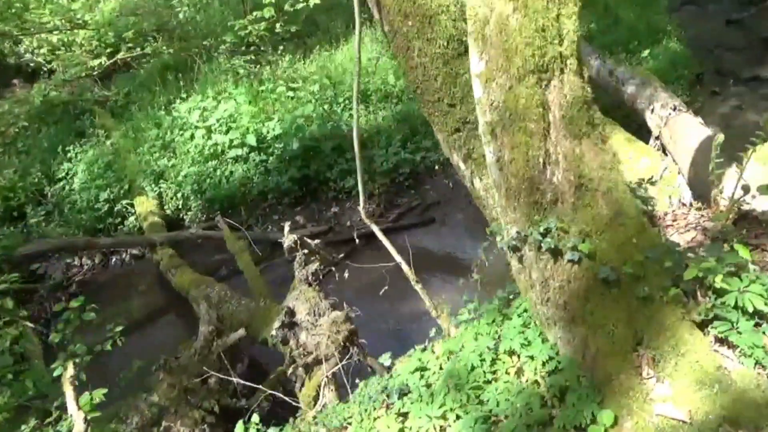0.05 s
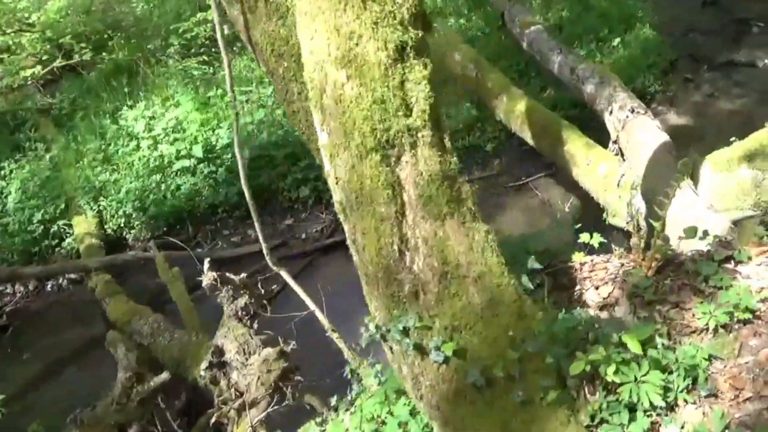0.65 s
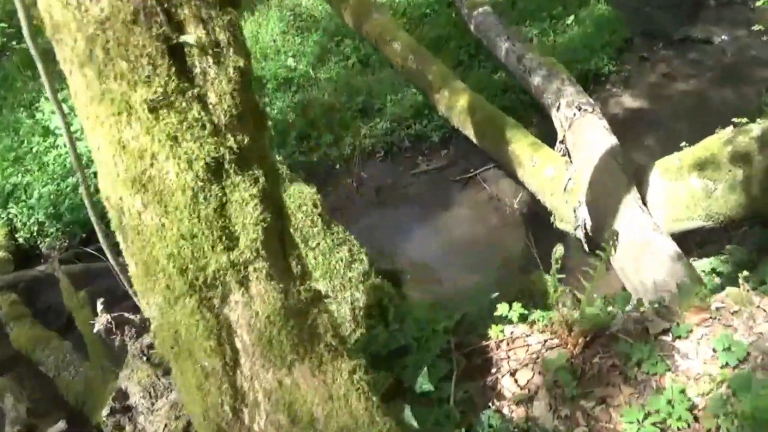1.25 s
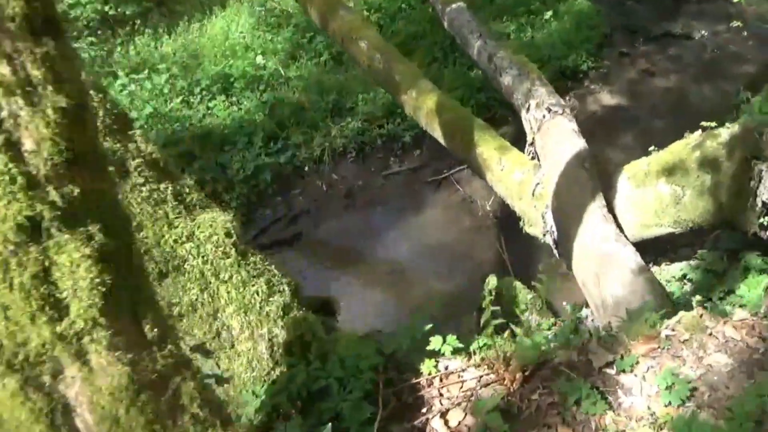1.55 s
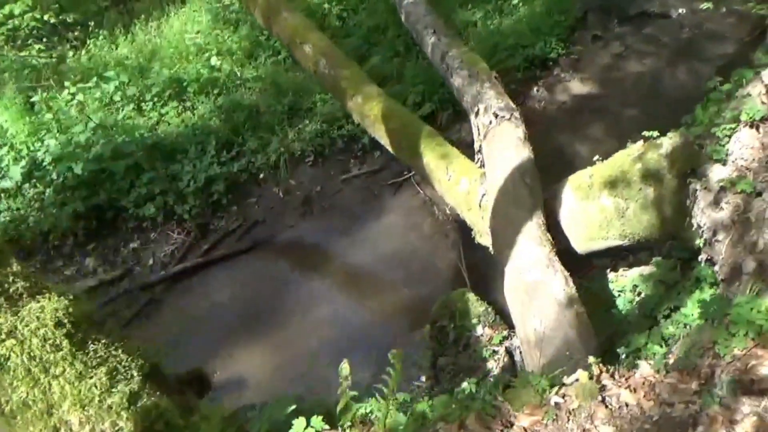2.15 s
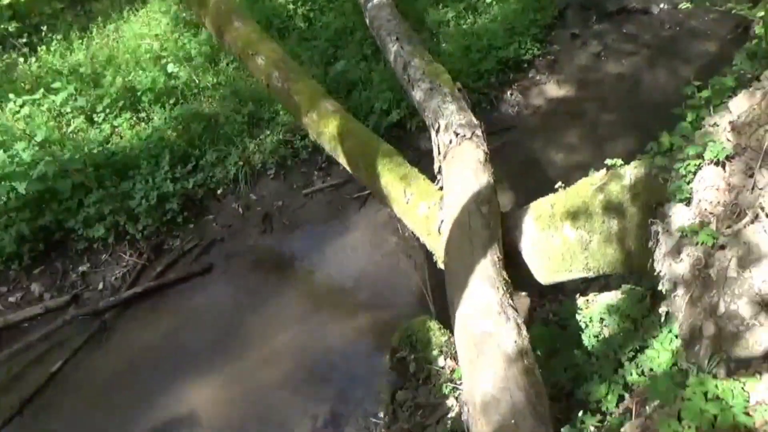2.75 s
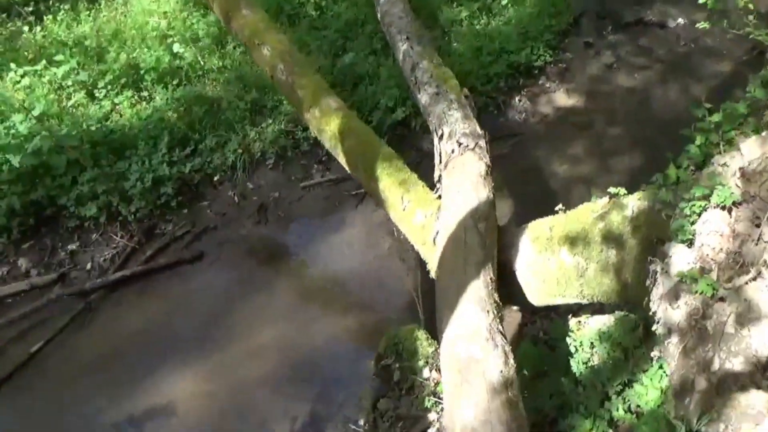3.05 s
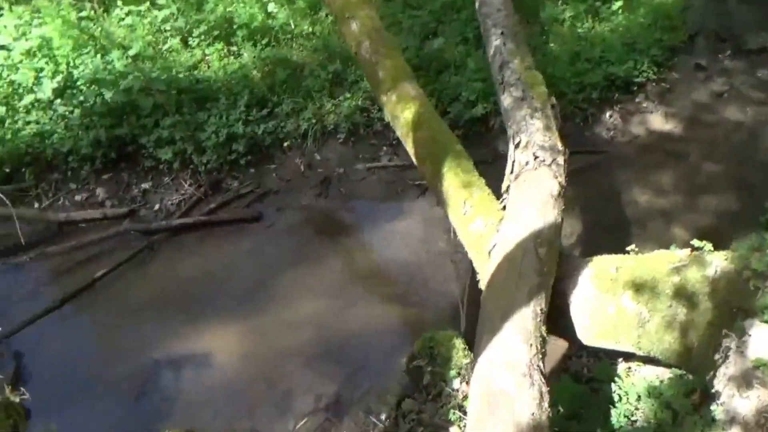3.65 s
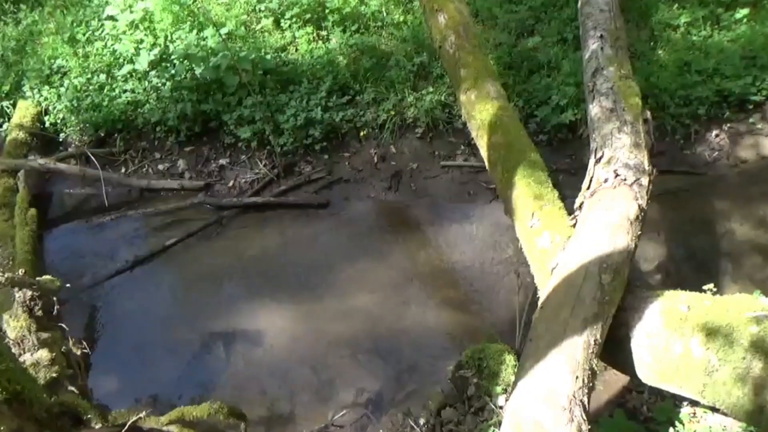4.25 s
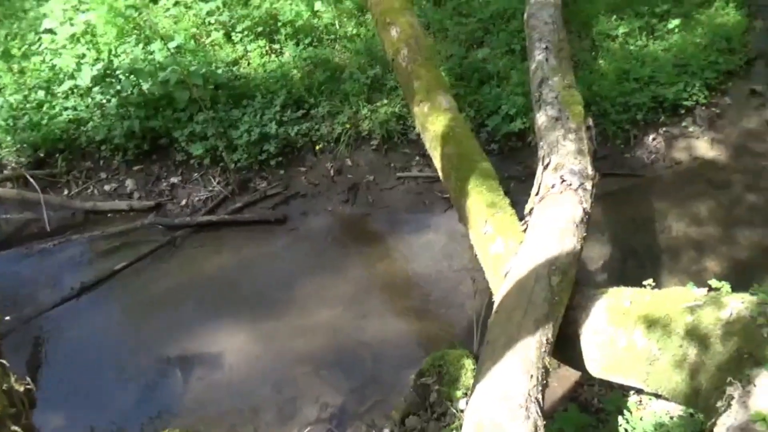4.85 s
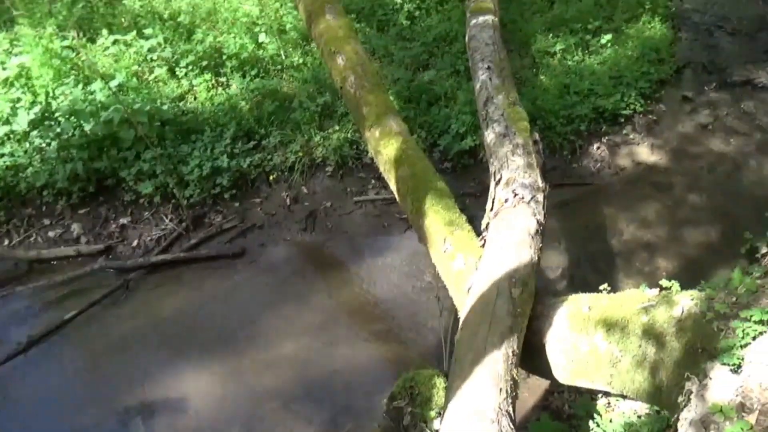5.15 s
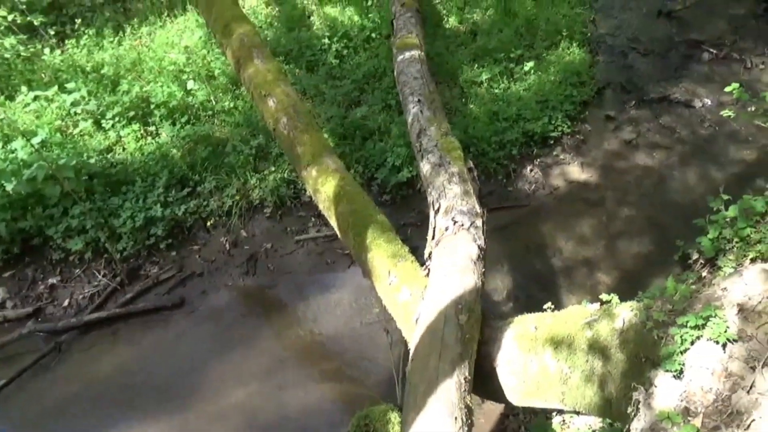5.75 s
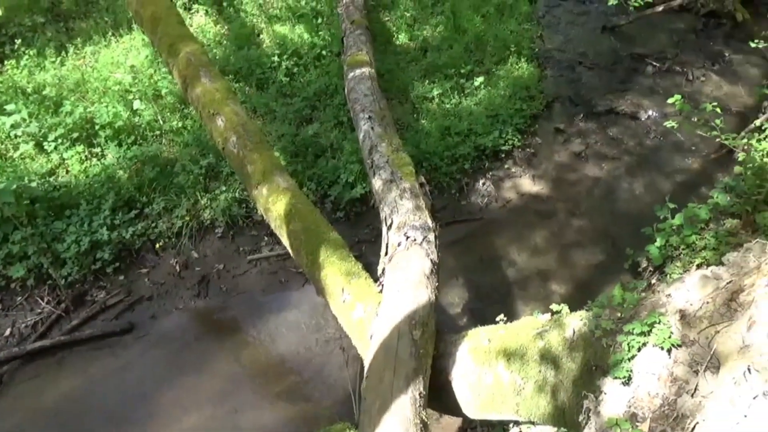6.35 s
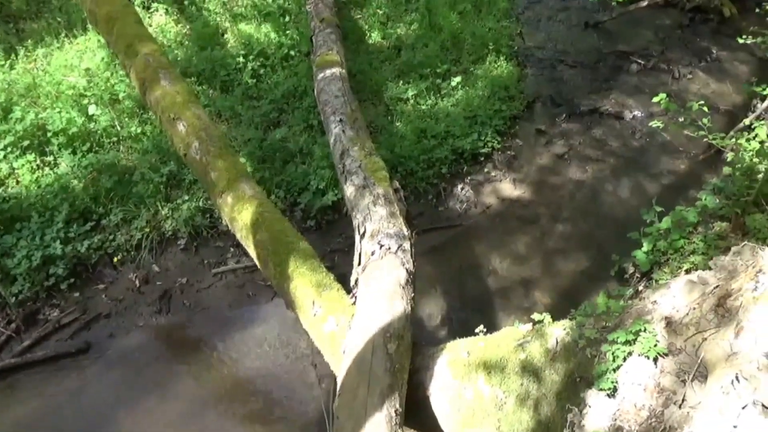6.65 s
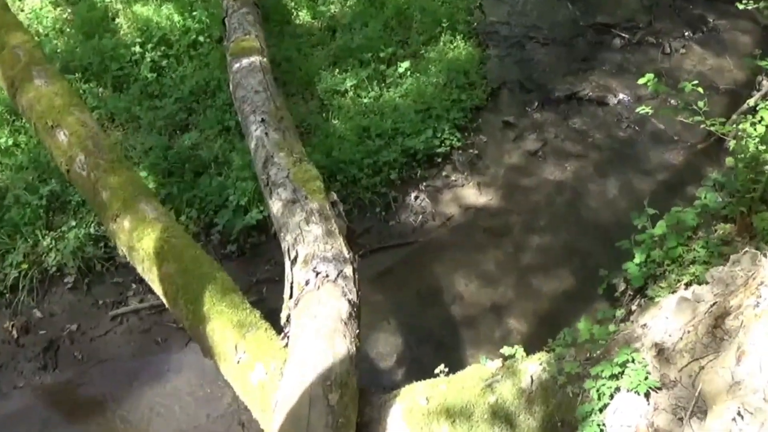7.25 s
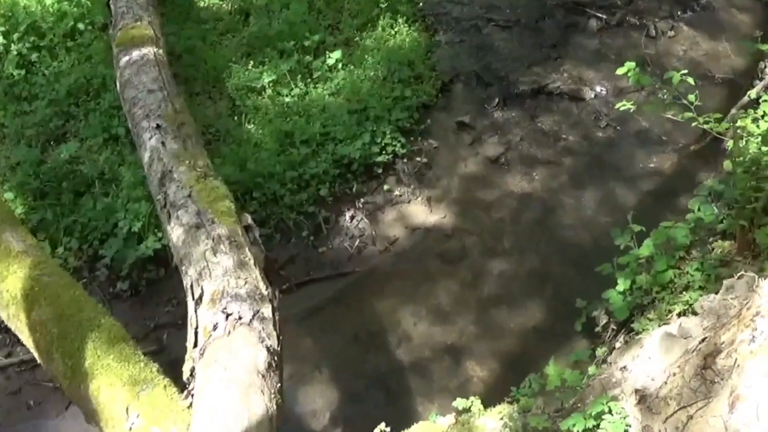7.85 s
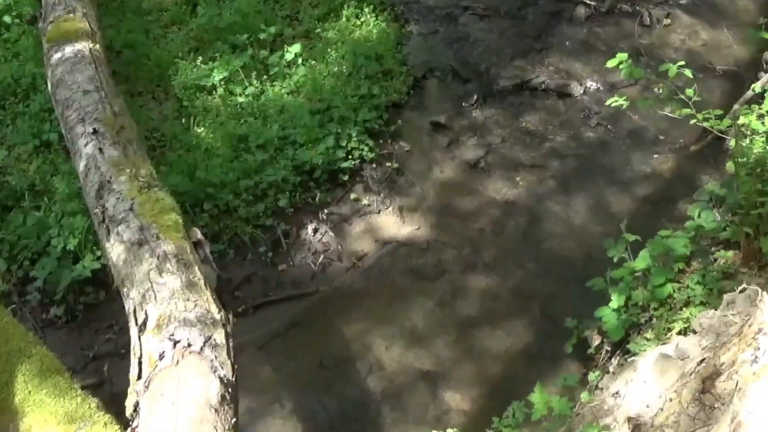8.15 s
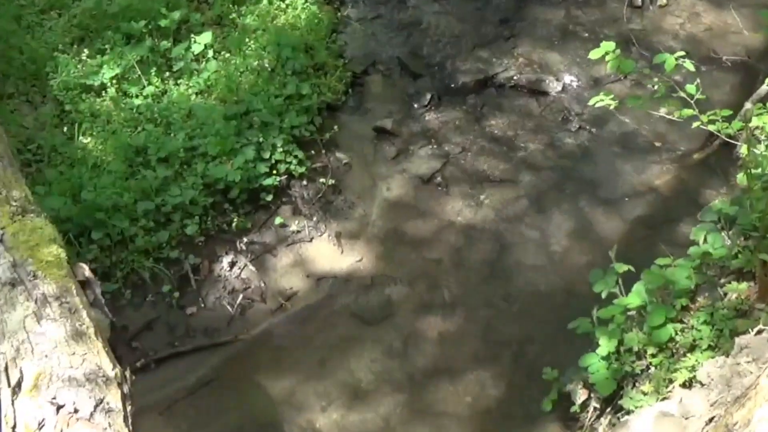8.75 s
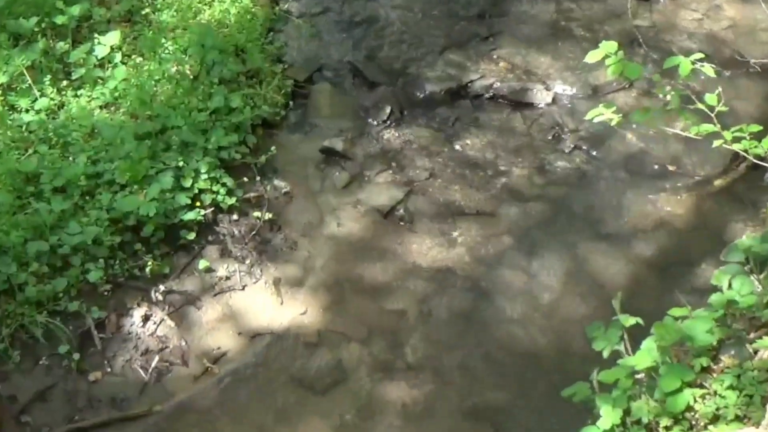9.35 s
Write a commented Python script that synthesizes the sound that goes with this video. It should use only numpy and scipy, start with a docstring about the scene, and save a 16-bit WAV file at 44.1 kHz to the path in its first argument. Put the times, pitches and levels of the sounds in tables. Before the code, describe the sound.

A shallow forest brook babbles over stones while feet shuffle in dry leaves nearby and small birds chirp faintly far off.

```python
"""Below a wooded bank, a shallow brook babbles over stones. Countless splashes sum to a wash of noise,
and trapped air resonates as swarms of small bubbles and single gurgles. Close by, someone shifts their
feet in dry leaves: stick-slip friction scuffs, brittle fracture crackles and snaps, impacts knock.
Small birds whistle far off in the reverberant trees, and a faint hum sounds for a while."""
import sys
import numpy as np
from scipy import signal
from scipy.fft import rfft, irfft
from scipy.io import wavfile
from scipy.ndimage import uniform_filter1d

SR = 44100
rng = np.random.default_rng(int(sys.argv[2]) if len(sys.argv) > 2 else 0)


def inscribe(sig):
    """Save sig as 16-bit PCM at rate SR to the path in sys.argv[1].

    A 1-D sig is mono; a 2-D sig holds one channel per row.
    Samples are clipped to [-1, 1] before scaling.
    """
    pcm = np.round(np.clip(np.atleast_2d(sig).T, -1, 1) * 32767)
    wavfile.write(sys.argv[1], SR, pcm.astype(np.int16))


N = 422919
TIME = np.arange(N) / SR


# Strength against pitch of the bubbles over the stones: f/Hz, relative level/dB
STONE_BUBBLES = [(450, -15), (580, -10), (800, -8), (1300, -5.5), (2300, -3), (3500, -3), (7000, -1.5)]
# The finer bubbles of the nearest riffle: f/Hz, relative level/dB
RIFFLE_BUBBLES = [(1000, -8), (2400, -1), (4800, 0)]

def brook(near_db=-42, far_db=-47, turn_s=6.2, wash_db=0.21, stones_db=-6, riffle_db=-8, banks_db=-8):
    """Superposition of wash and bubbles, fading as the listener turns from the nearest riffle."""
    facing = np.exp(-TIME / turn_s)
    flow = gain_of(far_db + (near_db - far_db) * facing)
    stones = gain_of(stones_db) * swarm(STONE_BUBBLES, count=3000, spread_db=4, cycles=6.4)
    riffle = gain_of(riffle_db) * facing * swarm(RIFFLE_BUBBLES, count=3000, spread_db=1, cycles=4.8)
    babble = flow * (stones + riffle) + gurgles()
    return flow * gain_of(wash_db) * wash() + babble + gain_of(banks_db) * scatter(babble, t60=0.07)


# Spectral density of the wash: f/Hz, relative level/dB
WASH_SPECTRUM = [(25, -48), (60, -26), (150, -22), (220, -12.5), (380, -10.5), (560, -0.5), (1200, 0),
                 (2400, -2), (3300, -4), (4600, -9), (6500, -10), (11000, -14)]
# Likeness of the diffuse sound at the two ears: f/Hz, coherence/1
EAR_COHERENCE = [(30, 0.89), (150, 0.83), (600, 0.87), (1400, 0.9), (2800, 0.73), (6000, 0.56),
                 (11000, 0.83)]

def wash(patchy_db=2.0, flicker_db=1.38):
    """Incoherent summation: far splashes merge into noise that swells in short, narrow patches."""
    frames, hz = N // 128 + 5, np.fft.rfftfreq(512, 1 / SR)
    a, b, c, d, patches = rng.standard_normal((5, frames, len(hz)))
    patches = smoothed(uniform_filter1d(patches, size=8, axis=0), 5)  # over time, then frequency
    flicker = smoothed(rng.standard_normal(frames), 5)[:, None]
    coherence = curve_at(EAR_COHERENCE, hz)
    left, unrelated = a + 1j * b, c + 1j * d
    right = coherence * left + np.sqrt(1 - coherence ** 2) * unrelated
    swell = gain_of(patchy_db * patches / (1 + hz / 9000) + flicker_db * flicker)
    spectra = np.array([left, right]) * swell
    _, noise = signal.istft(spectra.transpose(0, 2, 1), nperseg=512, noverlap=384)
    return coloured(noise[:, :N], WASH_SPECTRUM)


def bubble(hz, cycles, rise):
    """Resonance of trapped air: nearing the surface it dies faster and, for rise > 0, climbs in pitch."""
    age = np.arange(int(4 * cycles / hz * SR)) / SR * hz / cycles  # in ring times of cycles / hz
    swell = age * np.exp(-age - age ** 2 / 2)
    return swell / swell.max() * np.sin(2 * np.pi * cycles * (age + rise * (age ** 2 / 2 - age)))


def swarm(levels, count, spread_db, cycles, rise=0.073, width=0.23):
    """Resonance scales inversely with size: of many random bubbles, the smallest ring high and briefly."""
    out = np.zeros((2, N))
    low_hz, high_hz = levels[0][0], levels[-1][0]
    for when, pitch, rank, ring, glide, side in rng.random((count, 6)):
        hz = low_hz * (high_hz / low_hz) ** pitch
        level_db = curve_at(levels, hz) - spread_db * np.log(max(rank, .04))  # a few stand out
        ping = bubble(hz, cycles * (.5 + ring), rise * 2 * glide)
        add(out, when * N / SR, placed(gain_of(level_db) * ping, width * (2 * side - 1)))
    return out / rms(out)


# The clearest single bubbles: t/s, level/dB, f/Hz
CLEAR_GURGLES = [(0.71, -40.5, 614), (1.014, -33.5, 1190), (1.106, -34, 1330), (1.388, -30, 3380),
                 (3.365, -44.5, 445), (3.402, -41.5, 516), (3.458, -33, 3330), (3.76, -30.5, 1680),
                 (3.877, -39, 740), (4.982, -33.5, 760), (5.061, -37, 764), (5.217, -40, 654),
                 (5.352, -38, 632), (5.802, -37.5, 803), (5.94, -41, 714), (6.1, -39, 682),
                 (6.166, -39, 1600), (6.49, -41, 834), (7.149, -37, 1740), (7.354, -39, 746),
                 (7.417, -41, 850), (7.428, -36, 1190), (7.616, -40, 568), (7.765, -42, 1100),
                 (8.205, -43, 1540), (8.208, -46, 770), (8.428, -37, 1163), (8.566, -41, 1260),
                 (8.64, -39.5, 712), (8.927, -40, 798), (9.548, -42, 835)]

def gurgles(cycles=6.8, rise=0.094, width=0.19):
    """Air entrainment: water folds over a stone and large bubbles plop, some level, some swooping up."""
    out = np.zeros((2, N))
    for s, db, hz in CLEAR_GURGLES + soft_gurgles():
        glide, side = rng.uniform(-1.36, 1, 2)
        add(out, s, placed(gain_of(db) * bubble(hz, cycles, rise * (1 + glide)), width * side))
    return out


def soft_gurgles(count=26, top_db=-42.5, range_db=3, low_hz=600, high_hz=2400, low_bias=1.5):
    """A random point process of softer bubbles, mostly low: rows of t/s, level/dB, f/Hz."""
    return [(when * N / SR, top_db - range_db * soft, low_hz * (high_hz / low_hz) ** (pitch ** low_bias))
            for when, soft, pitch in rng.random((count, 3))]


# Strokes of the feet: t/s, time pressed/s, crackle level/dB, scuff level/dB
FOOT_STROKES = [(0.346, .03, -43, -47), (0.8, .075, -38, -39), (0.913, .06, -37, -41.5),
                (1.345, .05, -44.5, -47), (1.54, .085, -43, -38), (1.761, .13, -56, -46),
                (2.521, .17, -34.5, -31.5), (2.75, .06, -39.5, -36), (2.849, 0.071, -40, -41.5),
                (3.032, .11, -42.5, -44), (3.587, .31, -42, -40), (4.25, .12, -46, -49),
                (4.365, 0.11, -37, -39), (4.533, .055, -24.5, -26), (4.91, .09, -54, -47),
                (6.6, .15, -41, -46), (6.706, .11, -39.5, -42.5), (6.815, .115, -35.5, -38)]

def footwork(attack_s=.03, release_share=0.36, unfold_db=-22, unfold_s=.11, rest_db=-53, settled_s=5.35):
    """Loading and elastic recovery: envelopes of stir and drag as feet press and lift and leaves unfold."""
    stir = gain_of(rest_db) * (TIME < settled_s)  # leaves keep ticking until the feet settle
    drag = np.zeros(N)
    for s, hold_s, crackle_db, scuff_db in FOOT_STROKES:
        age = np.maximum(TIME - s, 0)
        lifted = np.maximum(age - hold_s, 0)
        onset = np.minimum(age / attack_s, 1)
        pressed = onset * np.exp(-lifted / (release_share * hold_s))
        unfolding = gain_of(unfold_db) * onset * np.exp(-lifted / unfold_s)
        stir += gain_of(crackle_db) * np.maximum(pressed, unfolding)
        drag += gain_of(scuff_db) * pressed
    return stir, drag


# Spectral density of crackling leaves: f/Hz, relative level/dB
CRACKLE_SPECTRUM = [(200, -32), (1500, -22), (4000, -7.5), (6000, -2.5), (9000, 2), (11000, -8)]

def crackle(stir, grains_per_s=1250, firm_db=-42, spread_db=3.5, clump=0.24):
    """Shot noise: breaking leaves emit impulses, so many under a firm stroke that they merge."""
    rate = grains_per_s * (stir / gain_of(firm_db) + 0.041) ** 0.88
    sizes = gain_of(spread_db * np.minimum(rng.exponential(1, N), 4)) * rng.choice([-1, 1], N)
    crumple = np.exp(clump * smoothed(rng.standard_normal(N), 350))  # one leaf gives a clump of ticks
    grains = sizes * (rng.random(N) < crumple * rate / SR) / np.sqrt(rate)
    stereo = placed(grains, 0.065) + 0.32 * grains * rng.uniform(-1.2, 1, (2, N))
    return stir * coloured(stereo, CRACKLE_SPECTRUM)


# Spectral density of a sole dragging through leaf litter: f/Hz, relative level/dB
SCUFF_SPECTRUM = [(40, -54), (150, -35), (380, -12), (700, -5.5), (1300, -0.5), (3000, -2.5), (4500, -6.5),
                  (8200, -4.5), (11000, -8.5)]

def scuff(drag, catch_db=3):
    """Stick-slip friction: the sole catches and slides, modulating its noise."""
    catching = gain_of(catch_db * smoothed(rng.standard_normal(N), 160))
    friction = rng.standard_normal(N) + 0.36 * rng.standard_normal((2, N))
    return drag * coloured(catching * friction, SCUFF_SPECTRUM)


def crunch(drag, count=110, over_drag_db=14.5, top_db=-17, range_db=18, low_hz=1300, high_hz=6500):
    """Brittle fracture: dry bits crack under the sole, more often and louder where it drags hard."""
    out, chance = np.zeros((2, N)), np.cumsum(drag)
    for when, pitch, soft, side in rng.random((count, 4)):
        at = np.searchsorted(chance, when * chance[-1])
        peak = min(drag[at] * gain_of(over_drag_db), gain_of(top_db)) * gain_of(-range_db * soft)
        crack = burst(low_hz * (high_hz / low_hz) ** pitch, octaves=0.6, decay_s=0.00065)
        add(out, at / SR, placed(peak * crack, .5 * (side - .5)))
    return out


# Snapping twigs and stalks, and a few small splashes: t/s, relative tick level/dB, crack level re tick/dB
SHARP_CLICKS = [(0.1639, -27, 0), (1.4396, -25, -5), (1.6015, -27.5, 5), (1.7066, -13.5, -25),
                (1.7786, -22, -5), (1.7893, -12.5, -15), (1.8238, -20.5, -17), (2.2675, -25, 1.5),
                (2.3865, -34.5, 15), (2.578, -17, -10), (2.635, -16, -16), (2.6473, -11.5, -5),
                (2.6699, -12, -3), (2.707, -22, 0), (2.7475, -19, 0), (2.8039, -13, -5), (2.869, -20, -6),
                (2.8865, -27.5, 8), (2.8903, -15, -9), (2.918, -17, -9), (2.9496, -16, -4.5),
                (2.9752, -27, -4), (2.997, -39, 12), (3.1371, -18.5, -24), (3.253, -20.5, -7),
                (3.399, -34, 6), (3.5987, -18, -15), (3.6156, -15, -15), (3.6711, -17, -13),
                (3.7618, -22, -14), (3.7727, -23, -20), (3.79, -8.5, -11), (3.8311, -14.5, -11),
                (3.838, -15, -13), (3.8891, -14, -14), (3.9549, -21.5, -7), (4.0038, -23, -19),
                (4.1118, -21, -6.5), (4.2813, -19, -22), (4.4244, -12, -26), (4.6658, -23, -18),
                (4.8068, -23, -0.5), (4.9332, -18, -14), (4.9635, -18.5, -15), (4.9807, -21.5, -4),
                (5.02, -20.5, -5), (5.1835, -19.5, -11), (5.3195, -26, -12), (5.3231, -26.5, 0),
                (5.9567, -29, 3.5), (6.7096, -18, -6), (6.8439, -22, 2), (7.277, -38, 11)]

def clicks(level_db=-0.5, tick_hz=8500, tick_s=0.00011, crack_hz=3400, crack_s=0.00014,
           ring_db=-1.5, ring_s=0.0014, cluster_db=-18, cluster_s=0.0046):
    """Impulsive excitation: a snap or small splash gives a sharp tick, a lower crack and a brief ring."""
    out = np.zeros((2, N))
    for s, db, crack_db in SHARP_CLICKS:
        side, detune = rng.uniform(-.1, .25), 2 ** rng.uniform(-.15, .15)
        pulses = (tick_hz * detune, tick_s, db), (crack_hz * detune, crack_s, db + crack_db)
        for hz, decay_s, pulse_db in pulses:
            add(out, s, placed(gain_of(pulse_db) * tick(hz, decay_s), side))
            ring = gain_of(pulse_db + ring_db) * burst(hz, octaves=0.88, decay_s=ring_s)
            add(out, s + decay_s, placed(ring, side))
        faint_tick = gain_of(db + cluster_db) * tick(tick_hz * detune, tick_s)
        for lead in rng.uniform(-0.33, 1, size=4):  # mostly just before the click, softening its attack
            add(out, s - cluster_s * lead * abs(lead), placed(faint_tick, side))
    return gain_of(level_db) * out


def tick(hz, decay_s):
    """Radiation from quick motion: a damped pulse with no bass, peaking at 1."""
    age = np.arange(int(12 * decay_s * SR) + 8) / (decay_s * SR)
    motion = age * np.exp(-age) * np.sin(2 * np.pi * hz * decay_s * age)
    pulse = np.diff(motion)
    return pulse / abs(pulse).max()


# Shoes landing on soil, roots and dry sticks: t/s, level/dB, f/Hz, half bandwidth/octaves, decay/s
SHOE_IMPACTS = [(1.586, -45, 150, 0.99, 0.015), (2.613, -18, 1750, .3, 0.0023),
                (2.649, -21.5, 1560, 0.4, .003), (2.696, -35.5, 396, 0.62, 0.0082),
                (4.568, -52, 135, .55, 0.018), (4.646, -18.5, 875, 0.38, 0.0022),
                (6.749, -27.5, 1480, 0.038, 0.011)]

def knocks():
    """Impact excitation: weight lands on soft ground or a root, or sets a dry stick ringing briefly."""
    out = np.zeros(N)
    for s, db, hz, octaves, decay_s in SHOE_IMPACTS:
        add(out, s, gain_of(db) * burst(hz, octaves, decay_s))
    return placed(out, 0)


# Bird notes: t/s, duration/s, relative level/dB, starting f/Hz, glide/Hz, mid-note arch/Hz
BIRD_NOTES = [(0.39, 0.051, -55, 3850, -30, 0), (0.613, 0.071, -51, 3630, -150, -3),
              (0.745, 0.056, -53.5, 4490, -40, 0), (1.108, 0.11, -57, 3770, 0, 2),
              (1.833, 0.058, -50.5, 2930, 168, 38), (3.01, 0.07, -54, 5400, 130, 30),
              (3.207, 0.135, -51.5, 5060, 370, -370), (8.074, 0.057, -63, 5020, -200, 0),
              (8.51, 0.1, -62, 5000, -180, -40), (8.774, 0.12, -63, 7140, -550, 8),
              (8.994, 0.067, -57.5, 5060, -230, -40), (9.025, 0.057, -54, 3854, -46, 6),
              (9.185, 0.13, -55, 5270, 270, 61), (9.23, .056, -58, 4900, -350, 0),
              (9.42, .055, -58, 5100, -240, -3), (9.484, 0.093, -50, 5400, 200, 30),
              (9.492, 0.048, -51, 3770, -25, 0)]

def birds(direct_db=6, forest_db=7, waver=0.0048):
    """Frequency modulation: thin whistles glide along gentle curves, smeared by forest reverberation."""
    out = np.zeros((2, N))
    for s, length_s, db, start_hz, glide_hz, arch_hz in BIRD_NOTES:
        progress = np.linspace(0, 1, int(length_s * SR))
        arch = np.sin(np.pi * progress)
        hz = start_hz + glide_hz * progress + arch_hz * arch
        hz *= 1 + waver * smoothed(rng.standard_normal(len(hz)), 120)
        whistle = gain_of(db) * np.sqrt(abs(arch)) * np.sin(2 * np.pi * np.cumsum(hz) / SR)
        add(out, s, placed(whistle, rng.uniform(-0.15, 0.29)))
    return gain_of(direct_db) * out + gain_of(forest_db) * scatter(out, t60=1.1)


def hum(hz=354, level_db=-68.5, start_s=5.2, length_s=3.18, waver=0.0128):
    """Slow random modulation: a faint tone wavers, comes and goes beneath the sound of the water."""
    out, swell = np.zeros(N), signal.windows.tukey(int(length_s * SR), .2)
    drift, fading = smoothed(rng.standard_normal((2, len(swell))), 6000)
    tone = np.sin(2 * np.pi * np.cumsum(hz * (1 + waver * drift)) / SR)
    add(out, start_s, gain_of(level_db) * swell * fading * tone)
    return placed(out, 0)


def scatter(x, t60):
    """Multiple reflection off banks and trunks: sparse echoes, unrelated in each ear, dying in t60 s."""
    t = np.arange(SR) / SR
    taps = rng.standard_normal((2, SR)) * (rng.random((2, SR)) < .05)
    taps *= (t > .003) * gain_of(-60 * t / t60)
    return signal.fftconvolve(x, taps / np.linalg.norm(taps, axis=1)[:, None], axes=1)[:, :N]


def burst(hz, octaves, decay_s):
    """Damped resonance: a dying band of noise, octaves to either side of hz, peaking near 1."""
    t = np.arange(int(8 * decay_s * SR) + 64) / SR
    edges = np.clip([hz / 2 ** octaves, hz * 2 ** octaves], 20, SR / 2 - 100)
    band = signal.butter(2, edges, "band", fs=SR, output="sos")
    ring = signal.sosfilt(band, rng.standard_normal(len(t)) * np.exp(-t / decay_s))
    return ring * np.sqrt(decay_s * SR / 8 / np.sum(ring ** 2))


def coloured(x, spectrum):
    """Linear filtering by a spectrum, scaled to rms 1."""
    shaped = irfft(rfft(x) * gain_of(curve_at(spectrum, np.fft.rfftfreq(N, 1 / SR))), N)
    return shaped / rms(shaped)


def smoothed(x, size):
    """Moving average over size points, scaled to rms 1."""
    slow = uniform_filter1d(x, size)
    return slow / rms(slow)


def curve_at(points, hz):
    """Interpolation on a log-frequency axis."""
    f, value = np.transpose(points)
    return np.interp(np.log(hz + 1), np.log(f + 1), value)


def gain_of(db):
    """Amplitude ratio of a level in decibels."""
    return 10 ** (np.asarray(db) / 20)


def rms(x):
    """Root-mean-square amplitude."""
    return np.sqrt(np.mean(x ** 2) + 1e-20)


def add(mix, s, sound):
    """Superposition of a sound on the mix at time s."""
    part = mix[..., max(round(s * SR), 0):][..., :sound.shape[-1]]
    part += sound[..., :part.shape[-1]]


def placed(sound, side):
    """Interaural level difference sets a mono sound to the left (+) or right (-)."""
    return np.array([1 + side, 1 - side])[:, None] * sound


def scene(near_echo_db=-13):
    """Superposition at the listener: the brook, nearby feet and clicks with echoes, far birds, the hum."""
    stir, drag = footwork()
    near = crackle(stir) + scuff(drag) + crunch(drag) + clicks() + knocks()
    return brook() + near + gain_of(near_echo_db) * scatter(near, t60=0.25) + birds() + hum()


def record(dry):
    """Band limiting: a steep low-pass filter removes the highest treble."""
    lowpass = signal.firwin(401, cutoff=11120, window=("kaiser", 8), fs=SR)
    return signal.oaconvolve(dry, lowpass[None], "same")


dry = scene()
out = record(dry)
inscribe(out)
```